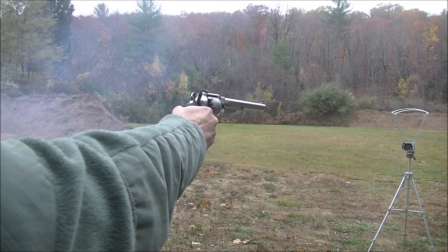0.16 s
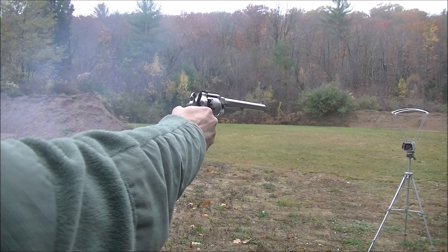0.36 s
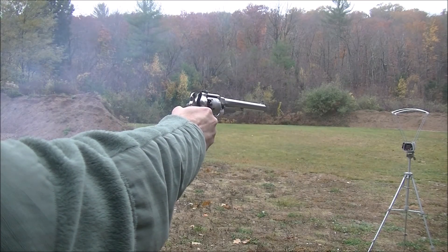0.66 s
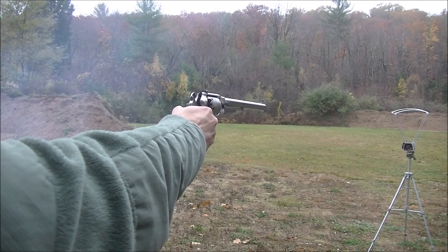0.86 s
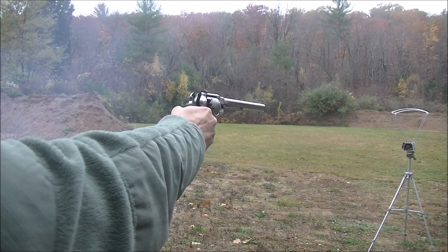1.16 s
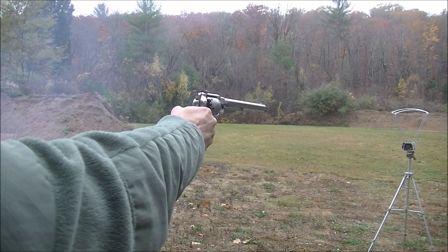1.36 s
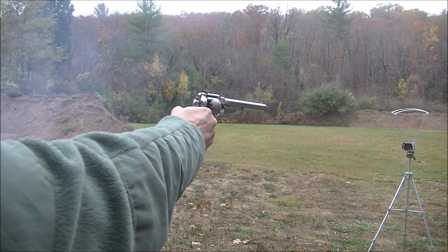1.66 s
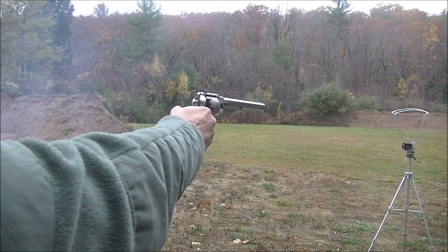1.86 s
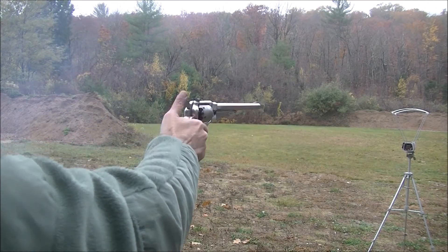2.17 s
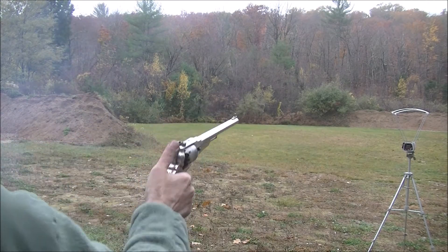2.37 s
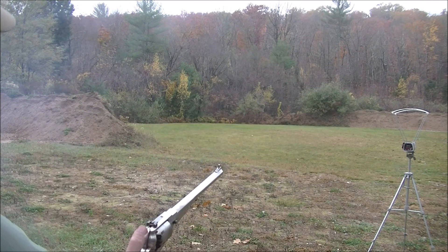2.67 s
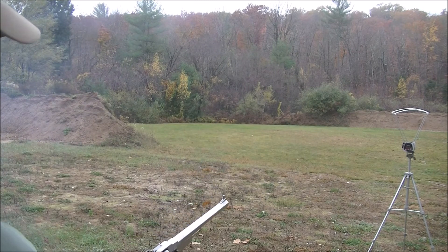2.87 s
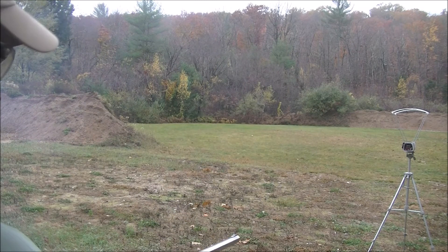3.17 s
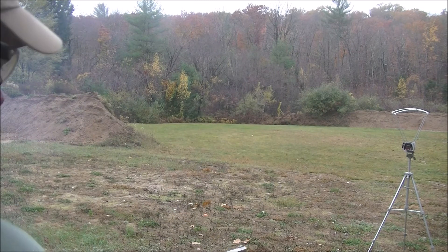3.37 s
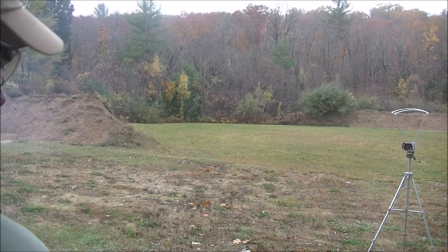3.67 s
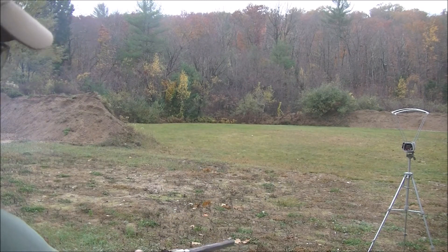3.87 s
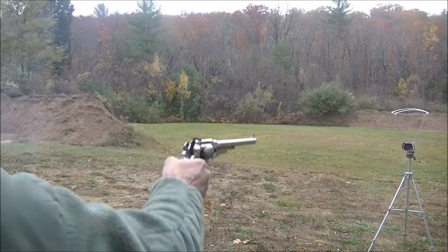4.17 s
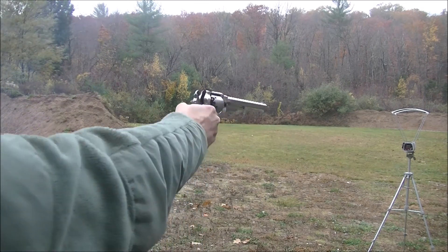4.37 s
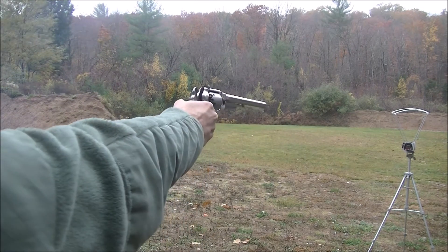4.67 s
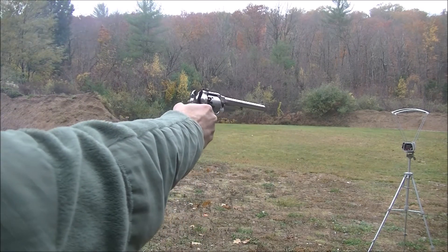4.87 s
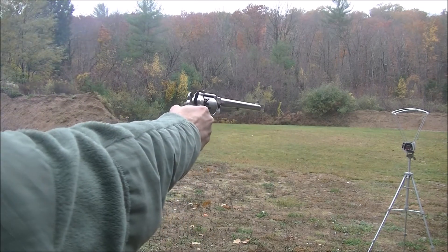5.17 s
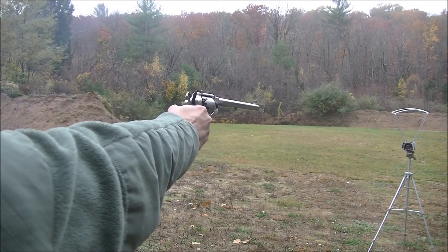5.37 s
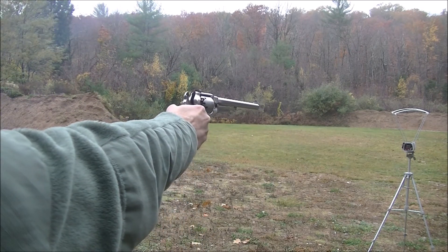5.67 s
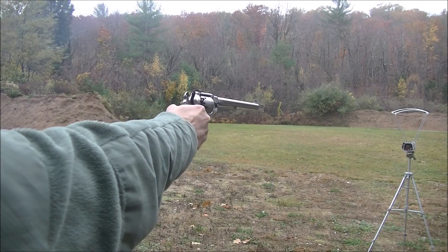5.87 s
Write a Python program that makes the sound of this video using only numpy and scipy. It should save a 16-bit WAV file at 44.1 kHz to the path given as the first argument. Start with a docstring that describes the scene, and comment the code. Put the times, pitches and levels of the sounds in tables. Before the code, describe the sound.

A revolver clicks sharply, fires one loud shot that rolls away through the woods, then clicks twice as it is cocked.

```python
"""An open grass range ringed by woods. A revolver close by is dry-snapped, opened and cocked: each impact
excites the modes of its steel and echoes faintly from berm and tree line. Between the clicks one shot
goes off out of sight; its blast overloads the recorder, then rolls away as sound scattered by the trees,
losing its treble first to absorption in the air. Dull ticks, far rumble and microphone hiss lie below."""
import sys
import numpy as np
from scipy import signal
from scipy.io import wavfile
from scipy.ndimage import uniform_filter1d, minimum_filter1d

SR = 44100
rng = np.random.default_rng(int(sys.argv[2]) if len(sys.argv) > 2 else 0)


def transcribe(u):
    """Save the signal u as a 16-bit wav file named by the first command-line argument.

    u: samples, shape (n,) or (channels, n), limited to [-1, 1]; the rate is SR.
    q: integer samples, one column per channel.
    """
    v = np.clip(np.atleast_2d(u).T, -1, 1)
    q = np.round(v * 32767).astype(np.int16)
    wavfile.write(sys.argv[1], SR, q)


N = 265393


def blast():
    """A blast wave arrives as a few brief pressure pulses, each a suction and then a push."""
    # first arrivals: start_s, level_db, length_ms
    arrivals = [(2.8402, 0, 0.71), (2.8411, -1.2, 1.27), (2.8435, 1, 0.92), (2.8446, -14.5, 1.6)]
    out = np.zeros((2, N))
    for start_s, level_db, length_ms in arrivals:
        phase = np.linspace(0, 1, round(length_ms * SR / 1000))
        pulse = -np.sin(2 * np.pi * phase) * np.sin(np.pi * phase) ** .5
        add(out, start_s, from_db(level_db) * pulse)
    return band(out, 150, 11000)


def roll(start_s=2.8403):
    """Atmospheric absorption: later echoes of the shot have crossed more air and carry less treble."""
    # spectral density just after the shot: frequency_hz, relative_db
    spectrum = [(50, -75), (90, -61.5), (130, -40), (200, -26), (350, -12.5), (620, -2), (1000, 0.5),
                (1550, -4.5), (2600, -7), (4200, -11), (5600, -23.5), (8000, -29), (11500, -43),
                (16000, -64)]
    # loss added to the overall fade (negative slows it): frequency_hz, loss_db_per_s
    air_loss = [(100, -4.5), (250, -5), (500, -2.5), (800, -1.04), (1400, 1.5), (2400, 5.5), (3300, 8),
                (4300, 14.5), (5400, 16), (7000, 27), (10000, 47), (16000, 57)]
    # likeness of left and right: frequency_hz, correlation
    coherence = [(60, 0.39), (130, 1), (290, 1.0), (640, 1), (1410, 0.98), (3100, 0.96), (6820, 0.91),
                 (15000, 0.53)]
    t = np.arange(N - round(start_s * SR)) / SR
    echoes = banded_noise(len(t), spectrum, coherence, flicker_db=.7, loss=air_loss, bands=40)
    out = np.zeros((2, N))
    add(out, start_s, scattering_envelope(t) * echoes)
    return out


def scattering_envelope(t):
    """Scattering returns in order of path length: near ground, a lull, the tree line, the far woods."""
    ground = from_db(-7 - 60 * t / .026)
    lull = from_db(-20)
    swell = np.clip((t - .012) / .016, 0, 1)   # the tree line answers after 12 ms
    hold_s, ease_s, near_db_per_s, far_db_per_s = .089, .21, 21.5, 12.5
    fading_s = np.maximum(t - hold_s, 0)
    eased_s = np.hypot(fading_s, ease_s) - ease_s   # the near fade sets in gradually
    near = from_db(-16.5 - near_db_per_s * eased_s)
    far = from_db(-20.5 - far_db_per_s * fading_s)
    lift = from_db(1.4 * np.exp(-((t - 1.76) / .4) ** 2))   # the roll swells slightly as it fades
    woods = np.hypot(near, far) * lift
    return np.hypot(ground, swell * woods + (1 - swell) * lull)


def revolver():
    """Impact excitation: every contact rings the same steel modes, coloured by the part that is struck."""
    # steel meeting steel: start_s, peak_db, rattle_ms, part
    contacts = [(1.2513, -17, .9, "hammer"), (1.2574, -15, 0.48, "sear"), (1.2583, -33, .9, "sear"),
                (1.2595, -4, 1.3, "hammer"), (1.265, -18, 0.37, "frame"), (1.2665, -15.5, 0.79, "frame"),
                (1.2683, -21, 5.6, "frame"), (1.984, -56, 1.2, "frame"), (2.233, -29.5, 3, "latch"),
                (2.2345, -29, 2.5, "latch"), (2.239, -34, 2.1, "latch"), (2.2425, -35, 2.2, "cylinder"),
                (2.246, -33.5, 1.7, "cylinder"), (2.2832, -30.5, 0.26, "stop"), (3.3313, -31, 0.93, "pawl"),
                (3.3346, -13.5, 1.32, "pawl"), (3.3381, -25, 2.3, "pawl"), (3.5708, -15, 1.2, "pawl"),
                (3.5742, -14, .8, "pawl"), (3.5784, -6.5, .6, "ratchet"), (3.585, -22, 1.4, "ratchet"),
                (3.7512, -30, 1, "stop"), (3.8988, -57, 1.2, "pawl")]
    # modes of frame and cylinder: pitch_hz, level_db, free_t60_s
    steel_modes = [(943, -18.5, .008), (1760, -2, 0.018), (2460, -12.5, .006), (3252, 2, 0.0075),
                   (3720, -4.5, .005), (4430, 4, 0.0093), (5030, 4.5, 0.0055), (7166, -1, .006),
                   (8550, -0.5, .006), (8960, 1, 0.011), (10940, -1, 0.02), (10680, 0.5, 0.0041),
                   (13150, -8.5, 0.0045), (13500, -8, 0.0045), (15000, -13, 0.0018), (16500, -16, .004)]
    # per part, colour against the mids: body_db, treble_db, top_db; then left_minus_right_db, t60_ratio
    parts = {"hammer": (-20, 2, -11, -.5, .75), "sear": (-6, 11, -3, 0.1, .45),
             "frame": (-4, -2.5, -12, .3, .5), "latch": (-11, 1, -20, 2.9, .4),
             "cylinder": (7, -5.5, -20, .6, .4), "stop": (-4, -3, -8, 2.4, .18),
             "pawl": (-5, 7, 4, 1.5, .24), "ratchet": (-12, 5, 13, .5, .25)}
    out = np.zeros((2, N))
    for start_s, peak_db, rattle_ms, part in contacts:
        body_db, treble_db, top_db, pan_db, t60_ratio = parts[part]
        click = struck(steel_modes, peak_db, rattle_ms, t60_ratio, (body_db, 0, treble_db, top_db))
        add(out, start_s, click * from_db([[pan_db / 2], [-pan_db / 2]]))
    return out


def struck(modes, peak_db, rattle_ms, t60_ratio, colour_db):
    """Modal superposition: a rattle of micro-impacts drives the modes; damping shortens their ring."""
    # body, mid, treble and top ranges: low_hz, high_hz
    ranges = [(750, 2000), (2000, 6200), (6200, 12300), (12300, 19000)]
    t = np.arange(2600) / SR
    attack = np.minimum(t * 4000, 1)
    rattle = rng.standard_normal(len(t)) * np.exp(-t * 1000 / rattle_ms) * attack
    spread_db = rng.normal(0, 1, len(modes))
    rings = sum(from_db(level_db + chance_db) * ring(rattle, pitch_hz, t60_s * t60_ratio)
                for (pitch_hz, level_db, t60_s), chance_db in zip(modes, spread_db))
    sound = sum(from_db(db) * band(rings, *edges) for db, edges in zip(colour_db, ranges))
    return from_db(peak_db) * sound / np.abs(sound).max()


def thumps():
    """A smooth one-sided pulse is rich in bass: a brief low thump sounds under the two loudest clicks."""
    # pulses: start_s, peak_db, length_ms
    pulses = [(1.2603, -25.5, 0.94), (3.5793, -42, 1.55)]
    out = np.zeros((2, N))
    for start_s, peak_db, length_ms in pulses:
        add(out, start_s, from_db(peak_db) * np.hanning(round(length_ms * SR / 1000)))
    return out


def ticks():
    """Light impacts nearby excite damped modes, heard as faint dull ticks."""
    # impacts: start_s, peak_db
    impacts = [(0.112, -41), (4.4826, -43.5), (4.7336, -53), (5.584, -43.5)]
    # resonances: pitch_hz, level_db, t60_s
    modes = [(1800, -16, .012), (2100, -6.5, 0.053), (2940, -6, 0.021), (3300, -5.5, .01),
             (3890, 3.5, 0.027), (5500, -18, 0.0092), (7740, -7, 0.014)]
    out = np.zeros((2, N))
    for start_s, peak_db in impacts:
        tick = struck(modes, peak_db, rattle_ms=.45, t60_ratio=1, colour_db=(-3.5, 0, -4, -25))
        add(out, start_s, tick)
    return out


def click_echo(clicks):
    """Diffuse reflection: countless returns blur into noise whose power follows the clicks and decays."""
    # echo from berm and tree line: low_hz, high_hz, gain_db, t60_s
    echo_bands = [(1000, 1900, -28.5, .4), (1900, 5300, -38.5, 0.34), (4580, 7100, -36.5, 0.32),
                  (7800, 11300, -48.5, 0.34), (12040, 16000, -46, .15)]
    scatter = rng.standard_normal(N) + .24 * rng.standard_normal((2, N))
    rise = np.exp(-1 / (.003 * SR))   # the returns build up over 3 ms
    out = np.zeros((2, N))
    for low_hz, high_hz, gain_db, t60_s in echo_bands:
        click_power = band(clicks.mean(axis=0) + 1e-9, low_hz, high_hz) ** 2
        decay = from_db(-120 / (t60_s * SR))
        echo_power = signal.lfilter([1 - rise], np.convolve([1, -rise], [1, -decay]), click_power)
        scatter = np.roll(scatter, SR // 2, axis=1)   # unrelated noise for each band
        out += from_db(gain_db) * np.sqrt(np.maximum(echo_power, 0)) * band(scatter, low_hz, high_hz)
    return out


def noise_floor():
    """Far rumble and microphone hiss sum to a nearly stationary broadband noise."""
    # spectral density: frequency_hz, relative_db
    spectrum = [(20, -11.5), (58, -13.5), (95, -10.5), (154, -14.5), (350, -4.5), (600, -1), (900, -3),
                (1550, -7), (3000, -10), (6000, -16), (10000, -18), (14000, -22.5), (15800, -21.5),
                (16600, -47.5)]
    # likeness of left and right: frequency_hz, correlation
    coherence = [(60, 0.11), (130, 0.26), (290, 0.57), (640, 0.35), (1410, 0.31), (3100, 0.5), (6820, 0.85),
                 (15000, 0.87)]
    return from_db(-65.5) * banded_noise(N, spectrum, coherence, flicker_db=.14)


def banded_noise(length, spectrum, coherence, flicker_db, loss=((1, 0), (2, 0)), bands=26):
    """Incoherent bands add in power: stereo noise starting near rms 1, each band with its own loss rate."""
    out, power, t = 0, 0, np.arange(length) / SR
    edges = np.geomspace(spectrum[0][0], 18000, bands + 1)
    white = rng.standard_normal((2, 2, length))   # neighbouring bands get unrelated noise
    for k, (low_hz, high_hz) in enumerate(zip(edges, edges[1:])):
        mid, side = band(white[k % 2], low_hz, high_hz)
        centre_hz = np.sqrt(low_hz * high_hz)
        level_db = at_hz(spectrum, centre_hz)
        correlation = at_hz(coherence, centre_hz)
        gain = from_db(level_db - at_hz(loss, centre_hz) * t + flicker_db * drift(7.1)[:length])
        stereo = np.sqrt(1 + correlation) * mid + np.sqrt(1 - correlation) * side * [[1], [-1]]
        out += gain * stereo
        power += 2 * from_db(2 * level_db) * np.mean(mid ** 2)
    return out / np.sqrt(power)


def drift(corner_hz):
    """Low-passed noise wanders slowly, with a standard deviation of 1."""
    step, settle = 40, 2000
    pole = np.exp(-2 * np.pi * corner_hz * step / SR)
    white = rng.standard_normal(N // step + settle + 2)
    slow = signal.lfilter([1], [1, -2 * pole, pole * pole], white)[settle:]
    return np.interp(np.arange(N) / step, np.arange(len(slow)), slow / slow.std())


def ring(drive, pitch_hz, t60_s):
    """A damped harmonic oscillator answers a unit impulse with a decaying sine of height 1."""
    decay, angle = from_db(-60 / (t60_s * SR)), 2 * np.pi * pitch_hz / SR
    return signal.lfilter([0, np.sin(angle)], [1, -2 * decay * np.cos(angle), decay * decay], drive)


def band(x, low_hz, high_hz):
    """Third-order band-pass filter."""
    return signal.sosfilt(signal.butter(3, [low_hz, high_hz], "band", fs=SR, output="sos"), x)


def at_hz(points, hz):
    """Interpolation of a table along a logarithmic frequency axis."""
    frequencies_hz, values = np.transpose(points)
    return np.interp(np.log(hz), np.log(frequencies_hz), values)


def from_db(db):
    """Decibels to amplitude ratio."""
    return 10 ** (np.asarray(db) / 20)


def add(out, start_s, sound):
    """Superpose a sound on the stereo track."""
    start = round(start_s * SR)
    out[:, start:start + sound.shape[-1]] += sound


def scene():
    """Linear superposition: the pressures of shot, clicks, echoes and background add."""
    clicks = revolver() + ticks()
    return noise_floor() + clicks + thumps() + click_echo(clicks) + blast() + roll()


def record(dry):
    """Overload: a fast limiter ducks small overshoots, larger ones clip; bass is spared, the top is cut."""
    ceiling, depth_db, window_s, spared_hz, cutoff_hz = .52, -1.5, .0008, 149.8, 17150
    window = round(window_s * SR)
    needed_gain = np.clip(ceiling / (np.abs(dry) + 1e-9), from_db(depth_db), 1)
    held_gain = minimum_filter1d(needed_gain, size=2 * window + 1)
    gain = uniform_filter1d(uniform_filter1d(held_gain, size=window), size=window)
    excess = dry - np.clip(gain * dry, -ceiling, ceiling)
    limited = dry - signal.sosfilt(signal.butter(3, spared_hz, "high", fs=SR, output="sos"), excess)
    return signal.sosfilt(signal.cheby2(12, 70, cutoff_hz, fs=SR, output="sos"), limited)


dry = scene()
out = record(dry)
transcribe(out)
```